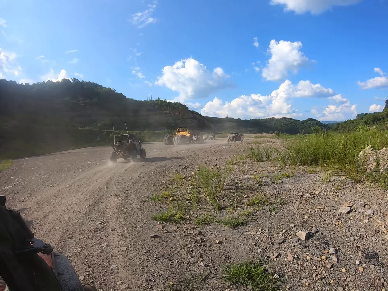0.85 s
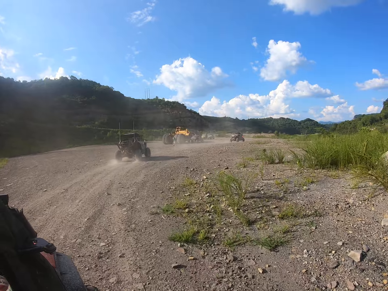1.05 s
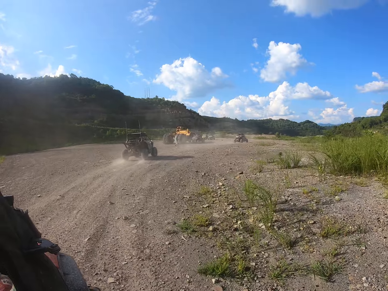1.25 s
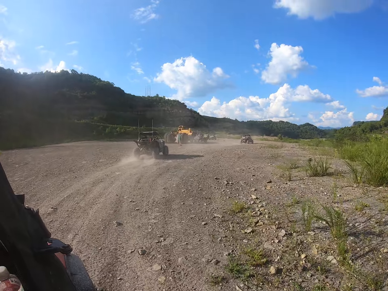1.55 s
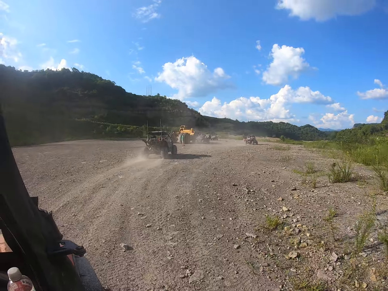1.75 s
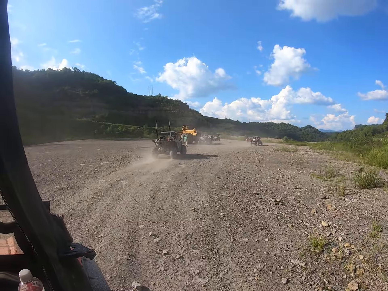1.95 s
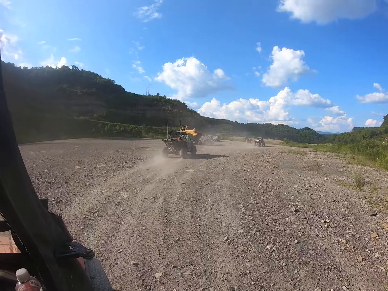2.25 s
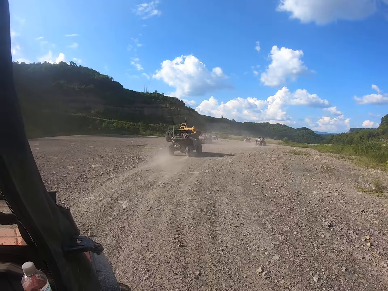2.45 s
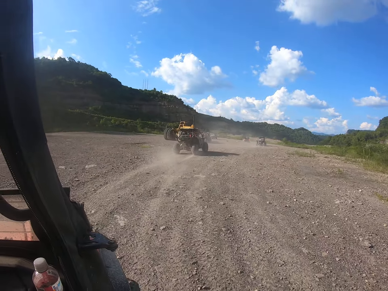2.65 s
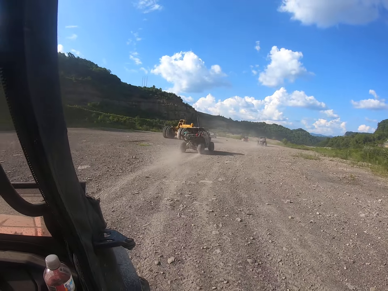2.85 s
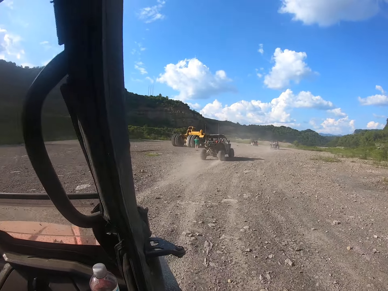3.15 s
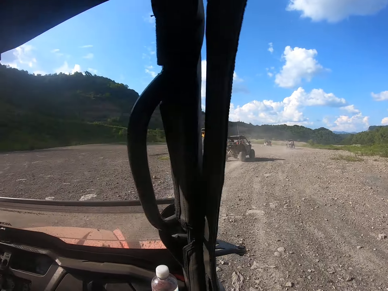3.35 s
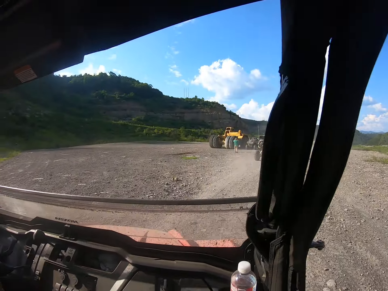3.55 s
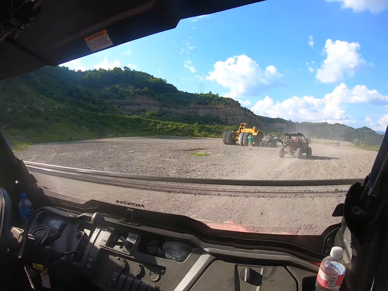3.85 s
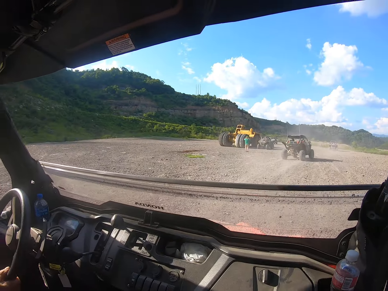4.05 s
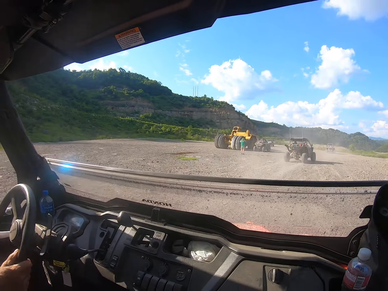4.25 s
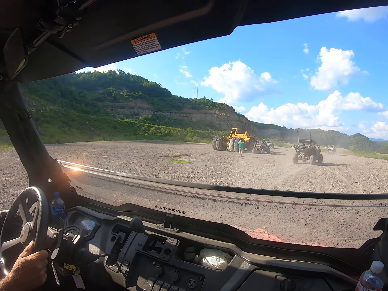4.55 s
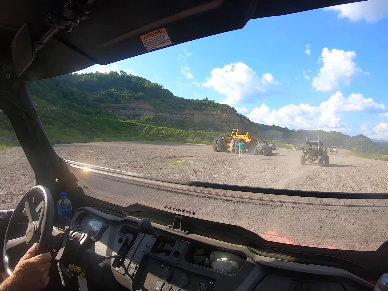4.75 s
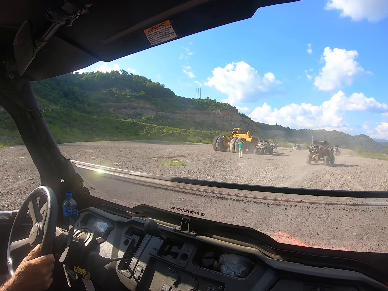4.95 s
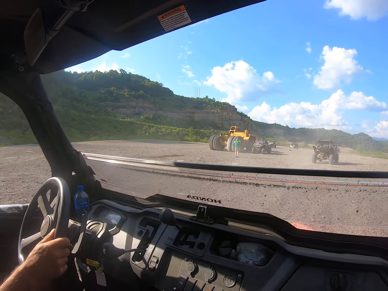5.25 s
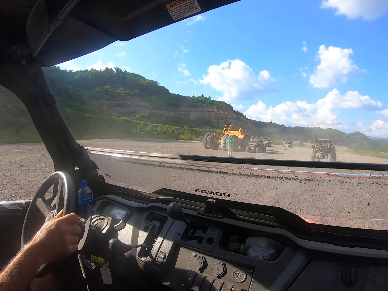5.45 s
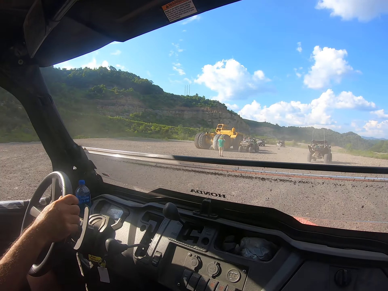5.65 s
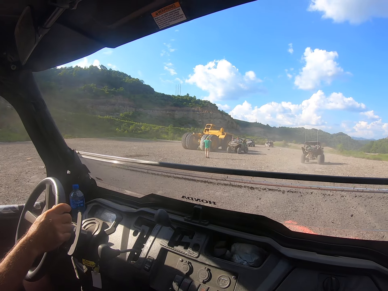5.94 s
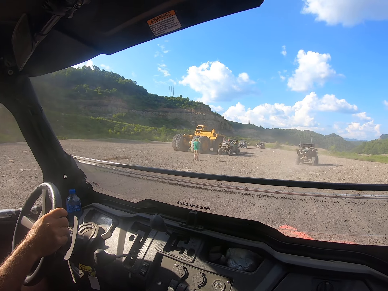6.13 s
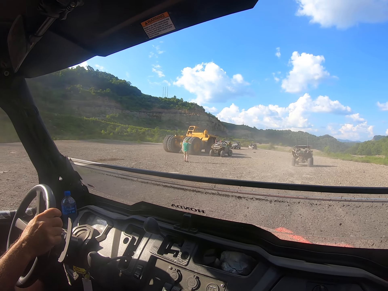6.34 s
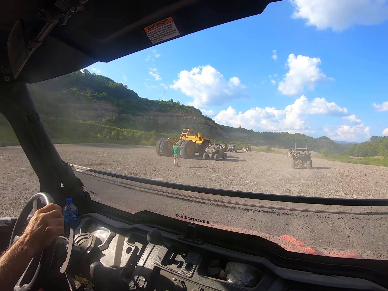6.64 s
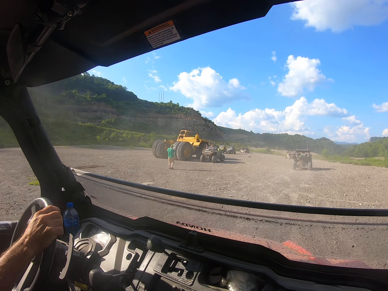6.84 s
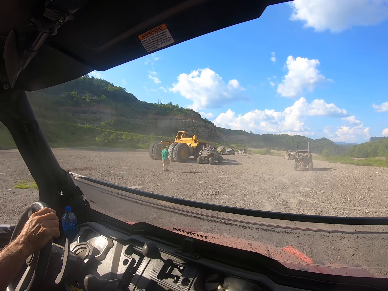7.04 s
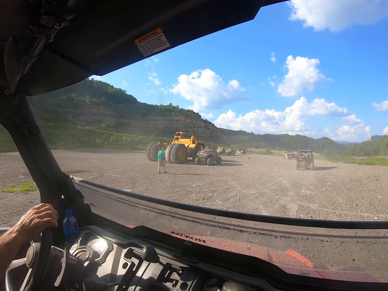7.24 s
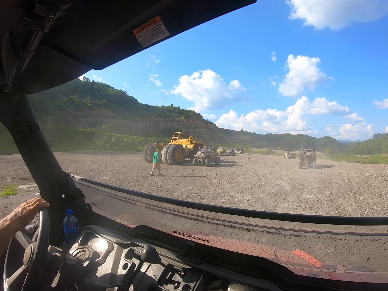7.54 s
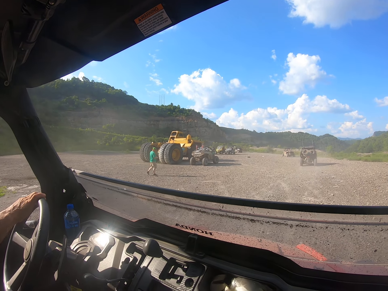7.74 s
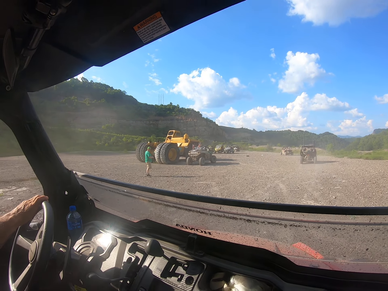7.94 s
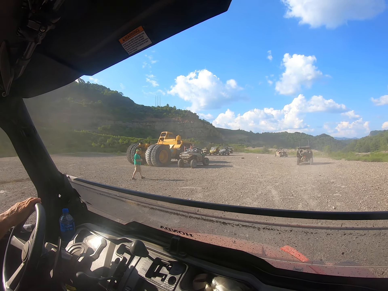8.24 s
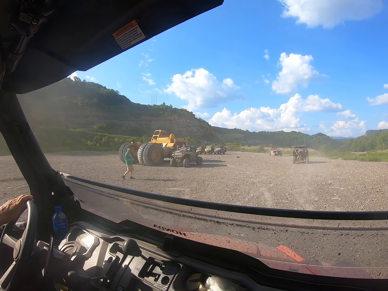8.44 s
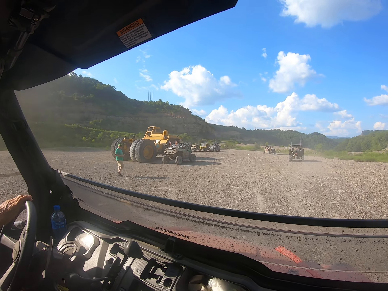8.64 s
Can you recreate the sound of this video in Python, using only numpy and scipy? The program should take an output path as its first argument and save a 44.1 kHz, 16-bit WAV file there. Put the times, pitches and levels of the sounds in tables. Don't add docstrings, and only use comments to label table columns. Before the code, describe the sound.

Gravel crunches under tyres as a buggy engine sinks in pitch, with wind buffeting, hard plastic knocks, booming cab air and a sliding driveline growl.

```python
import sys
import numpy as np
from scipy import signal
from scipy.fft import rfft, irfft
from scipy.io import wavfile
from scipy.ndimage import uniform_filter1d

SR = 44100
rng = np.random.default_rng(int(sys.argv[2]) if len(sys.argv) > 2 else 0)


def bounce(signal):
    frames = np.transpose(np.atleast_2d(signal))
    limited = np.clip(frames, -1, 1)
    pcm = np.round(limited * 32767).astype(np.int16)
    wavfile.write(sys.argv[1], SR, pcm)


def rack_gain(trim_db):
    fader = np.asarray(trim_db, float)
    return 10 ** (fader / 20)


N = 387625

# [f/Hz, level/dB per Hz]
WIND_SPECTRUM = [(8, -33.5), (16, 6.5), (27, 10), (42, -1.5), (60, -3.5), (90, -9), (150, -59), (300, -130)]
# [t/s, peak level/dB, length/s]
GUSTS = [(.3, -40, 0.54), (.68, -21.5, 0.54), (1.49, -21.5, 0.14), (2.2, -19.5, 0.43), (2.62, -26, 0.11),
         (2.91, -21, 0.98), (3.33, -18.5, 0.22), (4.7, -33.5, 0.98), (5.14, -23, 0.23), (5.95, -31, 0.16),
         (7.34, -39.5, .5), (7.78, -36, 0.22), (8.75, -37.5, 0.71)]
# [t/s, peak level/dB, length/s]
CAB_BOOMS = [(.59, -26.5, 0.049), (.8, -30.5, 0.74), (1.04, -20, 0.037), (1.12, -25.5, 0.23),
             (1.5, -25, 0.76), (4.02, -20, 0.21), (4.232, -30, 0.16), (4.548, -14, 0.22),
             (4.738, -20, 0.26), (5.114, -14.5, 0.15), (5.9, -22.5, 0.28), (6.03, -27, 0.17)]
# [f/Hz, width/Hz, level/dB]
CAB_MODES = [(178, 36, 1), (205.5, 42, -2.5), (219, 40, -12)]
# [t/s, peak level/dB, f/Hz, length/cycles]
AIR_SLAPS = [(4.445, -18, 138, 1.4), (4.503, -16, 186, 2.5), (4.544, -10, 193, 2.4),
             (4.593, -16.5, 206, 4.8), (4.64, -23, 165, 2), (4.742, -10.5, 193, 1.7),
             (4.805, -19.5, 180, 3.4), (4.838, -21.5, 187, 2.1), (4.999, -13, 173, 1),
             (5.079, -15, 177, 3.1), (5.115, -9.5, 203, 2.2), (5.147, -14, 172, 1.3), (5.17, -22, 202, 1.2),
             (5.978, -18, 187, 1.5), (6.007, -15, 200, 1.8), (6.052, -16.5, 182, 1.8),
             (6.088, -23.5, 148, 2)]
# [f/Hz, level/dB per Hz]
RUMBLE_SPECTRUM = [(24, -35.5), (40, -11.5), (70, -4), (97, -8), (130, -4), (185, -13), (287, -20.5),
                   (322, -20.5), (395, -22), (600, -38), (780, -58), (1320, -120)]
# [t/s, peak level/dB, f/Hz]
JOLTS = [
    (3.871, -8.5, 106),
    (3.938, -11.5, 63),
    (4.031, -10.5, 135),
    (4.271, -19, 68.6),
    (5.097, -13, 86),
]
# [t/s, roughness level/dB, loose stone level/dB]
TRAIL = [(0, -1.5, -1.5), (.5, 0, 0.5), (1.4, -1, -1), (1.66, -3.5, 0), (2, 1, 1), (2.5, 0, 1.5),
         (3.15, 0.5, 1), (3.35, 2, 2), (3.9, 5.5, 3.5), (4.04, 6.5, 4.5), (4.13, -8, 0.5), (4.25, 0.5, 0),
         (4.95, 1.5, .5), (5.25, -1, 0), (5.9, 1.5, 2.5), (6.5, 2, 3), (7.2, -1, 2.5), (8.79, -1, 0.5)]
# [t/s, share inside/0-1]
TURN_IN = [
    (0, 0.09),
    (3.2, 0.34),
    (4.2, 0.03),
    (5.5, 0.85),
    (8.79, 1),
]
# [f/Hz, level/dB per Hz]
GRAVEL_OUTSIDE = [(540, -7.5), (700, -1.5), (950, 1), (1300, -1), (1600, 4), (2300, 2), (2700, -12.5),
                  (3400, -20), (3900, -17.5), (5200, -22.5), (6800, -25), (9300, -35.5), (12500, -57),
                  (14500, -59)]
# [f/Hz, level/dB per Hz]
GRAVEL_INSIDE = [(540, 2.5), (700, -4.5), (950, -11), (1300, -9), (1600, -1.5), (2300, 0.5), (2700, -13.5),
                 (3400, -15.5), (3900, -20.5), (5200, -27), (6800, -32.5), (9300, -41), (12500, -59.5),
                 (14500, -66.5)]
# [f/Hz, width/Hz, lift outside/dB, lift inside/dB]
PANELS = [(1050, 177, 7, 9.5), (1320, 51, -6.5, -7), (1500, 110, 4, 7), (1705, 18, 6.5, 13),
          (1810, 59, 4.5, -5.5), (2086, 160, 2.5, -2.5), (2940, 170, 8.5, 2.5), (3320, 267, 12, 6),
          (4560, 310, 10.5, 8.5), (5700, 240, 4.5, 4.5), (8150, 600, 7.5, 5.5), (9860, 210, -9, -11.5),
          (11000, 1330, 11.5, 5.5), (12800, 1200, 12.5, 10)]
# [t/s, peak level/dB, ring f/Hz, length/s]
GRIT_TICKS = [(0.003, -63, 12400, .02), (2.158, -54, 7200, .006), (2.236, -55, 11000, .006),
              (2.317, -49, 7110, .006), (2.372, -47, 7210, .008), (2.4, -48, 8800, .01),
              (3.075, -54, 7370, .005), (3.225, -52, 6380, .005), (3.597, -53, 8150, .004),
              (4.026, -51, 9000, .006), (6.318, -51, 7880, .005), (6.404, -51, 6010, .005),
              (3.813, -62, 11000, 0.0031), (4.409, -57, 10700, 0.0072), (4.48, -38, 4600, 0.009),
              (4.77, -46, 4700, 0.0044), (4.973, -40, 3320, 0.021), (4.996, -47.5, 9500, 0.013),
              (5.193, -25.5, 2330, 0.025), (5.22, -35, 4520, 0.0068), (5.353, -34.5, 3240, 0.0073),
              (5.772, -26.5, 2300, 0.018), (5.804, -32.5, 3380, 0.0082), (5.905, -35, 4560, 0.0065),
              (6.661, -22.5, 2240, 0.0048), (7.771, -44.5, 8200, 0.01), (7.772, -35, 4700, 0.008),
              (8.484, -38, 5000, .012), (5.55, -39, 4600, .01), (6.04, -44, 5300, .006),
              (5.146, -41, 4600, .005)]
# [t/s, level/dB, length/s]
DUST_SPRAYS = [
    (5.354, -56, 0.011),
    (7.769, -53, .012),
    (8.48, -56, .02),
]
# [f/Hz, level/dB, t60/s]
HOUSING = [(640, -17, 0.022), (780, -14.5, 0.027), (1000, -22.5, 0.082), (1128, -5, 0.028),
           (1270, -3, 0.008), (1580, -17, 0.037), (2133, -16, 0.011)]
# [t/s, peak level/dB, loudest f/Hz, spread/ms]
CAGE_RATTLE = [(.028, -24.5, 1160, 2.1), (0.093, -17.5, 1340, 1.2), (.432, -22.5, 790, 4),
               (.571, -24.5, 810, 1.3), (0.59, -18.5, 1530, 1.3), (.683, -7, 1390, 1.1),
               (.727, -25, 640, 2.3), (0.744, -4, 1320, 1.2), (.816, -17, 1150, 1.7),
               (0.829, -5, 1180, 2.6), (.85, -12.5, 1290, 2.3), (0.913, -4.5, 1234, 2.2),
               (0.974, -17, 766, 0.52), (1.007, -9, 734, 2.7), (1.022, -9.5, 1210, 1.3),
               (1.041, -5.5, 1590, 0.85), (1.111, -2.5, 895, 1.5), (1.158, -11.5, 960, 3.3),
               (1.191, -19, 870, 2.3), (1.24, -16, 1160, 1.8), (1.282, -8, 1010, 5.3),
               (1.35, -30, 1030, 2.2), (1.395, -29, 711, 2.8), (1.415, -12, 857, 2.2),
               (1.462, -2, 1180, 1.8), (1.476, -11.5, 800, 3), (1.501, -16.5, 720, 1.2),
               (1.514, -23, 1002, 1.7), (1.56, -12.5, 1260, 1.1), (1.664, -19, 683, 3),
               (1.678, -8, 1000, 3.5), (1.786, -19.5, 780, 2.3)]
# [t/s, peak level/dB, loudest f/Hz, brightness/dB]
HANDLING = [(2.212, -25, 1610, -43), (2.873, -39, 1500, -21), (3.164, -22, 2010, -16),
            (3.229, -28, 1036, -48), (3.333, -21, 1500, -12), (3.435, -22.5, 1015, -57),
            (3.467, -19.5, 696, -22), (3.502, -18.5, 650, -40), (3.512, -7.5, 1250, -34),
            (3.526, -14, 1090, -42), (3.637, -17, 855, -47), (3.675, -21.5, 780, -45),
            (3.733, -16, 1110, -30), (3.863, -15, 1810, -21), (3.951, -17.5, 1090, -20),
            (3.988, -11, 1800, -26), (4.017, -15, 1610, -22), (4.028, -16, 940, -16),
            (4.052, -20.5, 960, -45), (4.11, -24, 975, -14), (4.198, -31, 1760, -45),
            (4.208, -21.5, 772, -45), (4.269, -27.5, 780, -45), (4.415, -28, 1850, -10),
            (4.441, -19, 2120, -12), (4.484, -17, 1150, -18), (4.504, -14.5, 960, -28),
            (4.658, -22.5, 1420, -47), (4.801, -17, 1330, -22), (4.906, -26, 960, -45),
            (4.99, -25, 1180, -12)]
# [t/s, peak level/dB, loudest f/Hz, brightness/dB]
CAB_TAPS = [(5.182, -29.5, 1450, -10), (5.196, -29, 2120, -12), (5.548, -31, 1780, -12),
            (5.607, -28, 1790, -19), (5.739, -33, 1822, -13), (5.765, -25, 1810, -14),
            (5.806, -24, 1050, -14), (5.836, -21.5, 1850, -17), (5.866, -22, 1070, -17),
            (5.903, -19.5, 1050, -11), (5.969, -25, 1770, -9), (6.129, -39, 1800, -16),
            (6.183, -32, 1770, -20), (6.2, -20.5, 1820, -15), (6.243, -28, 1500, -20),
            (6.284, -27, 1040, -17), (6.331, -34, 1780, -19), (6.436, -31, 1800, -10),
            (6.459, -28, 1830, -8), (6.478, -23, 1660, -10), (6.53, -24, 1780, -24),
            (6.599, -33, 1630, -20), (6.667, -18, 1800, -11), (6.703, -33, 1690, -23),
            (6.755, -33, 1700, -20), (7.663, -36, 1688, -21)]
# [start t/s, length/s, rub level/dB, hiss level/dB]
HAND_STROKES = [
    (3.856, 0.12, -23, -42),
    (4.006, 0.05, -29.5, -50),
    (4.076, .04, -55, -45),
    (4.465, 0.049, -27.5, -52),
    (5.74, 0.185, -38, -61),
]
# [start t/s, end t/s, start f/Hz, end f/Hz, level/dB]
SINGING = [(2.7, 3.6, 2080, 2500, -53), (2.3, 3.9, 2230, 2200, -44), (2.1, 3.2, 1720, 1400, -46),
           (2.6, 4.08, 1980, 1100, -46), (2.8, 4.0, 1800, 2200, -44), (6.1, 7.6, 1300, 1600, -57),
           (5.9, 8.1, 1400, 1560, -45), (8.1, 8.75, 1480, 1420, -46), (8.0, 8.45, 3900, 3900, -51),
           (6.6, 7.2, 2100, 2250, -52), (7.3, 8.0, 2250, 2300, -53), (7.0, 7.9, 2000, 1900, -53.5),
           (1.1, 2.2, 243, 260, -43.5), (1.95, 2.8, 205, 216, -41), (1.9, 2.4, 300, 300, -47),
           (3.5, 3.75, 272, 280, -45), (5.25, 6.0, 340, 410, -46), (5.95, 6.75, 260, 312, -46),
           (8, 8.4, 232, 240, -44), (5.95, 5.6, 432, 425, -48.5), (1.45, 2.3, 145, 158, -36),
           (1.7, 3.8, 72, 74, -33)]
# [t/s, f/Hz, level/dB]
SHAFT = [(1.9, 2330, -58), (2.3, 2390, -53), (2.6, 2487, -52.5), (2.95, 2520, -58), (3.5, 2480, -59),
         (3.9, 2456, -60), (4.15, 2300, -46.5), (4.35, 2080, -55)]
# [t/s, centre f/Hz, level/dB]
GROWL = [(0, 2330, -61), (2.3, 2300, -53.5), (3.2, 2230, -57.5), (3.7, 2020, -42), (4.6, 1850, -45.5),
         (5.6, 1960, -36.5), (6.4, 1810, -37.5), (7.1, 1680, -39.5), (7.8, 1590, -39.5), (8.3, 1500, -40),
         (8.79, 1390, -49.5)]
# [f/Hz, width/Hz, level/dB]
CASING = [(1419, 110, -4), (1530, 30, -10.5), (1680, 39, -5), (1800, 91, -1), (1953, 120, -5.5),
          (2330, 140, 2.5)]
# [t/s, firing rate f/Hz, firing tone level/dB]
ENGINE = [(0, 108.9, -34), (1.6, 110, -30), (2.3, 110.1, -29.5), (3, 107.9, -29.5), (3.8, 104.9, -39),
          (4.5, 106.5, -29.5), (5.7, 103.7, -28.5), (6.2, 100.4, -26), (6.7, 95.53, -24),
          (7.2, 93.36, -27.5), (7.8, 92, -22), (8.3, 90.26, -30), (8.79, 88.3, -28.5)]
# [multiple of the firing rate, level/dB]
ENGINE_ORDERS = [(.6, -9.5), (1, -3), (1.5, -17.5), (2, -20), (2.5, -25)]
# [start t/s, end t/s, multiple of the firing rate, level/dB, slip of the multiple/per s]
GEAR_MESH = [
    (1.299, 3, 3.37, -46.5, -0.076),
    (5.298, 5.8, 2.93, -45, 0.54),
    (6.9, 8.602, 3.49, -48, -.01),
]
# [t/s, f/Hz, level/dB]
BELT_WHINE = [(4.8, 5600, -70.5), (5.8, 5350, -71), (6.3, 5030, -67), (6.86, 5016, -61.5), (7.2, 4540, -61),
              (7.6, 4800, -59.5), (7.87, 4600, -59), (8.28, 4490, -58), (8.55, 4560, -67)]


def rms_one(x):
    return x / np.sqrt(np.mean(x ** 2) + 1e-20)


def in_time(rows):
    s, *columns = np.transpose(rows)
    return [np.interp(np.arange(N) / SR, s, c) for c in columns]


def gate(rows, fade):
    start, end = rows[0][0], rows[-1][0]
    return np.interp(np.arange(N) / SR, [start - fade, start, end, end + fade], [0, 1, 1, 0])


def drift(rate):
    r = np.exp(-80 * np.pi * rate / SR)
    chance = rng.standard_normal(N // 40 + 2002)
    slow = signal.lfilter([1], [1, -2 * r, r * r], chance)[2000:]
    return np.interp(np.arange(N) / 40, np.arange(len(slow)), rms_one(slow))


def colour(x, spectrum, lifts=()):
    hz = np.maximum(np.fft.rfftfreq(N, 1 / SR), 1)
    corner_hz, corner_db = np.transpose(spectrum)
    db = np.interp(np.log(hz), np.log(corner_hz), corner_db)
    for top_hz, width, lift_db in lifts:
        db = db + lift_db / (1 + ((hz - top_hz) / width) ** 2)
    return rms_one(irfft(rfft(x) * rack_gain(db), N))


def band(x, low_hz, high_hz):
    return signal.sosfilt(signal.butter(2, [low_hz, high_hz], "band", fs=SR, output="sos"), x)


def ring(clicks, hz, t60):
    r, w = rack_gain(-60 / (t60 * SR)), 2 * np.pi * hz / SR
    return signal.lfilter([0, np.sin(w)], [1, -2 * r * np.cos(w), r * r], clicks + 1e-18)


def narrow_noise(hz, width):
    r = np.exp(-np.pi * width / SR)
    poles = [1, -2 * r * np.cos(2 * np.pi * hz / SR), r * r]
    once = signal.lfilter([1, 0, -1], poles, rng.standard_normal(N))
    return rms_one(signal.lfilter([1, 0, -1], poles, once))


def tone(hz, wobble, flutter_db, rate):
    phase = 2 * np.pi * np.cumsum(hz * (1 + wobble * drift(rate))) / SR
    return np.sqrt(2) * np.sin(phase) * rack_gain(flutter_db * drift(rate))


def grains(per_s, spread_db):
    sizes = rack_gain(spread_db * np.minimum(rng.exponential(1, N), 5)) * rng.choice([-1, 1], N)
    return sizes * (rng.random(N) < per_s / SR)


def swells(rows, rise):
    t, out = np.arange(N) / SR, 0
    for s, peak_db, length in rows:
        away = np.maximum((s - t) / rise, (t - s) / (1 - rise))
        out = out + rack_gain(peak_db - 34 * away / (2 * length))
    return out


def wind():
    breeze_db, = in_time([(2.83, -24), (2.95, -45.5)])
    strength = rack_gain(breeze_db) + swells(GUSTS, 0.46)
    return strength * rack_gain(drift(8)) * colour(rng.standard_normal(N), WIND_SPECTRUM)


def cab_booms():
    cab = rms_one(sum(rack_gain(db) * narrow_noise(hz, width) for hz, width, db in CAB_MODES))
    return swells(CAB_BOOMS, 0.56) * rack_gain(-3.5) * cab


def air_slaps():
    out, lag = np.zeros(N), np.arange(-2500, 2500) / SR
    for s, peak_db, hz, cycles in AIR_SLAPS:
        at = round(s * SR)
        slap = np.cos(2 * np.pi * hz * lag) * np.exp(-(lag * hz / cycles) ** 2)
        out[at - 2500:at + 2500] += rack_gain(peak_db) * slap
    return out


def body_rumble(rough_db):
    strength = rack_gain(-29.5 + rough_db + 0.72 * drift(30))
    return strength * colour(rng.standard_normal(N), RUMBLE_SPECTRUM)


def jolts():
    out = np.zeros(N)
    for s, peak_db, hz in JOLTS:
        cycles = (np.arange(N) / SR - s) * hz
        out += rack_gain(peak_db) * np.cos(2 * np.pi * cycles) * np.exp(-cycles ** 2)
    return out


def stone_crunch():
    return rms_one(grains(3000, 1.5)) + 0.85 * rng.standard_normal(N)


def gravel(stone_db):
    inside, = np.clip(in_time(TURN_IN), 0, 1)
    outer_lifts = [(hz, width, out_db) for hz, width, out_db, in_db in PANELS]
    inner_lifts = [(hz, width, in_db) for hz, width, out_db, in_db in PANELS]
    outer = colour(stone_crunch(), GRAVEL_OUTSIDE, outer_lifts)
    inner = colour(stone_crunch(), GRAVEL_INSIDE, inner_lifts)
    mix = np.sqrt(1 - inside) * outer + np.sqrt(inside) * inner
    mix = band(mix, 384, 18000)
    grit = signal.sosfiltfilt(signal.butter(2, 3800, "high", fs=SR, output="sos"), mix)
    crunch_db, grit_db = -39 + stone_db, -60.5 + 1.3 * stone_db + 3.5 * inside
    return rack_gain(drift(24.4)) * (rack_gain(crunch_db) * (mix - grit) + rack_gain(grit_db) * rms_one(grit))


def grit_ticks():
    out, lag = np.zeros(N + 2000), np.arange(2000) / SR
    for s, peak_db, hz, length in GRIT_TICKS:
        burst = rng.standard_normal(len(lag)) * np.exp(-lag / length) * (1 - np.exp(-lag / 0.0014))
        low_crackle = rms_one(band(burst, 1800, 3300))
        plastic = rms_one(ring(burst, hz, 0.0072))
        tick = band(0.37 * low_crackle + plastic, 1300, max(hz, 6000) * 0.81)
        at = round(s * SR)
        out[at:at + len(lag)] += rack_gain(peak_db) * tick / np.abs(tick).max()
    return out[:N]


def dust_sprays():
    puffs = np.zeros(N)
    for s, db, length in DUST_SPRAYS:
        since = np.arange(N) / SR - s
        puffs += rack_gain(db) * (since > 0) * np.exp(-np.abs(since) / length)
    return puffs * rms_one(band(grains(8300, 2.5), 3500, 7500))


def all_knocks():
    rattle = [(s, db, hz, -20 + 1.4 * db - 0.5 * ms, ms / 1000) for s, db, hz, ms in CAGE_RATTLE]
    handling = [(s, db, hz, bright, (4.46 + 0.15 * db) / 1000) for s, db, hz, bright in HANDLING]
    taps = [(s, db, hz, bright, 0.0022) for s, db, hz, bright in CAB_TAPS]
    return rattle + handling + taps


def knocks():
    lag = np.arange(-600, 900) / SR
    out = np.zeros(N + 1500)
    soft = signal.butter(5, [590, 2300], "band", fs=SR, output="sos")
    hard = signal.butter(3, [2300, 5000], "band", fs=SR, output="sos")
    thin = signal.butter(2, 900, "high", fs=SR, output="sos")
    fade_in = np.minimum((lag - lag[0]) / 0.0026, 1)
    fade_out = np.minimum((lag[-1] - lag) / 0.0037, 1)
    for s, peak_db, pitch_hz, bright_db, spread in all_knocks():
        chance = rng.standard_normal(len(lag))
        swell = 1 / np.cosh((lag + 0.00054) / np.clip(1.05 * spread, 0.0006, 0.01))
        loose_tail = 0.04 * np.exp(-((lag - 0.003) / 0.027) ** 2)
        contacts = (swell + loose_tail) * chance * fade_in
        body = ring(contacts, pitch_hz, 0.012)
        for hz, db, t60 in HOUSING:
            body += rack_gain(db - 5.5 + 2 * rng.standard_normal()) * ring(contacts, hz, t60)
        shell_push = chance[::-1] / np.cosh(lag / 0.015)
        hum = ring(shell_push, (1090 + pitch_hz) / 2, 0.019)
        body = body / np.abs(body).max() + rack_gain(-16.5) * hum / np.abs(hum).max()
        body = signal.sosfilt(soft, body)
        if s > 5.1:
            body = signal.sosfilt(thin, body)
        hardest = contacts * swell
        crack = signal.sosfilt(hard, hardest + rack_gain(-12.5) * ring(hardest, 3240, 0.0067))
        knock = body / np.abs(body).max() + rack_gain(bright_db) * crack / np.abs(crack).max()
        at = round(s * SR)
        out[at:at + len(lag)] += rack_gain(peak_db) * fade_out * knock
    return signal.sosfilt(signal.butter(4, 6500, fs=SR, output="sos"), out)[600:N + 600]


def scrape():
    slips = grains(4000, 2.5) * rack_gain(1.7 * drift(70))
    narrow_hiss = rms_one(band(band(slips, 4300, 5050), 4300, 5050))
    hiss = narrow_hiss + 0.59 * rms_one(band(slips, 2800, 8300))
    body = rms_one(band(band(slips, 840, 1900), 710, 2900))
    out = np.zeros(N)
    for s, length, rub_db, hiss_db in HAND_STROKES:
        since = np.clip(np.arange(N) / SR - s, 0, 1)
        touch = np.interp(since, [0, 0.017, length, length + 0.008], [0, 1, 1, 0])
        rub = rack_gain(rub_db - 35 * since) * body
        out += touch * (rub + rack_gain(hiss_db - 3.5 - 68 * since) * hiss)
    return out


def singing():
    out, wander, flutter = np.zeros(N), drift(60), drift(25)
    for k, (start, end, start_hz, end_hz, db) in enumerate(SINGING):
        at = np.arange(round(start * SR), min(round(end * SR), N))
        own = at - 9000 * k
        hz = np.linspace(start_hz, end_hz, len(at)) * (1 + 0.008 * wander[own])
        fade = np.sqrt(np.hanning(len(at)) * 2)
        out[at] += rack_gain(db + 2 * flutter[own]) * fade * np.sin(2 * np.pi * np.cumsum(hz) / SR)
    return out


def shaft():
    shaft_hz, shaft_db = in_time(SHAFT)
    return gate(SHAFT, 0.15) * rack_gain(shaft_db) * tone(shaft_hz, 0.008, 3, 60)


def driveline():
    centre_hz, growl_db = in_time(GROWL)
    out = np.zeros(N)
    for hz, width, db in CASING:
        nearness = np.exp(-((centre_hz - hz) / 220) ** 2)
        out += nearness * rack_gain(db + 0.78 * drift(1)) * narrow_noise(hz, width)
    return rack_gain(growl_db) * out


def gear_mesh(firing_hz):
    out = np.zeros(N)
    for start, end, multiple, mesh_db, slip in GEAR_MESH:
        loaded = [(start, multiple), (end, multiple + slip * (end - start))]
        mesh_hz = in_time(loaded)[0] * firing_hz
        out += gate(loaded, 0.17) * rack_gain(mesh_db) * tone(mesh_hz, 0.003, 1.6, 5)
    return out


def belt_whine():
    whine_hz, whine_db = in_time(BELT_WHINE)
    first = rack_gain(2.5 * drift(6)) * tone(whine_hz, 0.014, 4, 110.1)
    second = tone(0.74 * whine_hz, 0.012, 3.5, 125)
    return gate(BELT_WHINE, 0.15) * rack_gain(whine_db + 0.5) * (first + second)


def engine():
    firing_hz, firing_db = in_time(ENGINE)
    drone = sum(rack_gain(db) * tone(k * firing_hz, 0.015, 3.5, 9) for k, db in ENGINE_ORDERS)
    return rack_gain(firing_db) * drone + gear_mesh(firing_hz) + belt_whine()


def scene():
    rough_db, stone_db = in_time(TRAIL)
    air = wind() + cab_booms() + air_slaps()
    ground = body_rumble(rough_db) + jolts() + gravel(stone_db) + grit_ticks() + dust_sprays()
    hand = knocks() + scrape()
    machine = singing() + shaft() + driveline() + engine()
    return (air + ground + hand + machine)[None]


def limiter(x, ceiling_db, release_db_s):
    ramp = release_db_s * np.arange(N) / SR
    over_db = np.maximum(20 * np.log10(np.abs(x) + 1e-9) - ceiling_db, 0)
    held_db = np.maximum.accumulate(over_db + ramp, axis=1) - ramp
    smooth_db = uniform_filter1d(uniform_filter1d(held_db, size=121), size=121)
    x = signal.sosfilt(signal.butter(6, 14200, fs=SR, output="sos"), x)
    return x * rack_gain(-0.6 * smooth_db)


def roll_off(x):
    return signal.sosfilt(signal.butter(12, 14900, fs=SR, output="sos"), x)


def record(dry):
    mix = limiter(dry, ceiling_db=-8.5, release_db_s=146)
    return roll_off(mix)


dry = scene()
out = record(dry)
bounce(out)
```